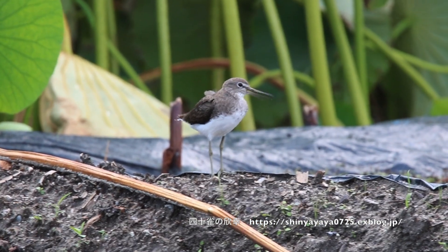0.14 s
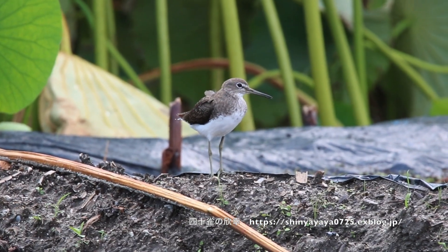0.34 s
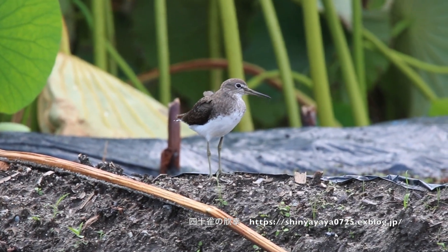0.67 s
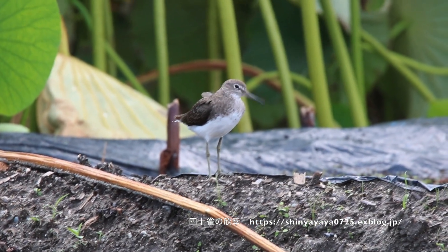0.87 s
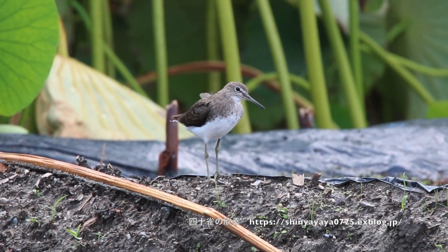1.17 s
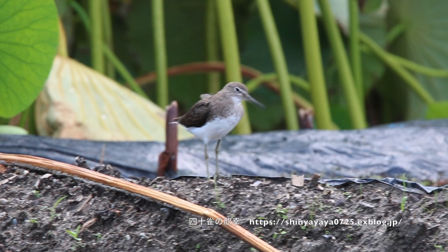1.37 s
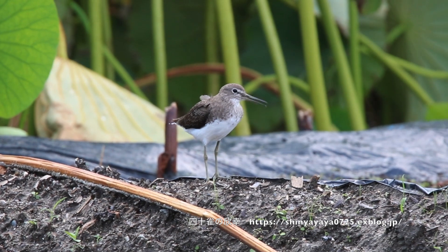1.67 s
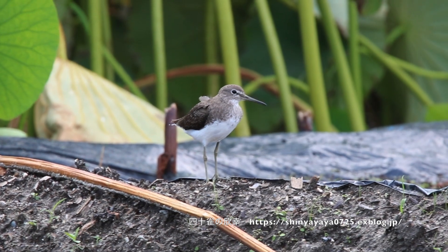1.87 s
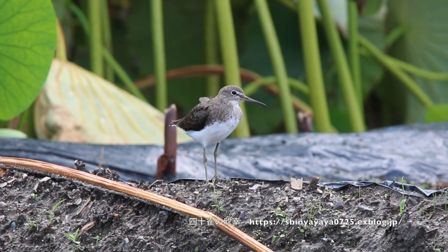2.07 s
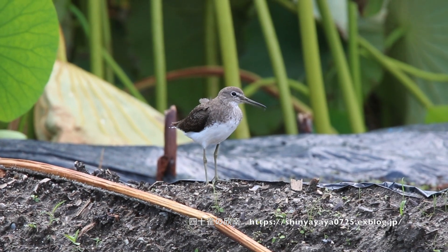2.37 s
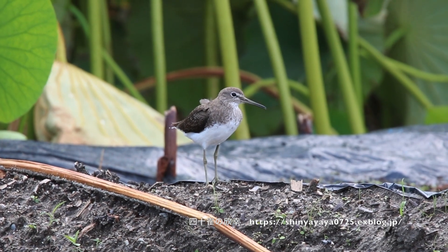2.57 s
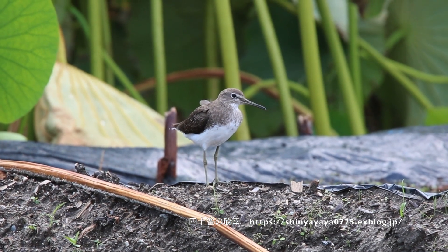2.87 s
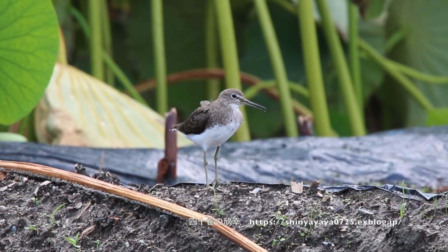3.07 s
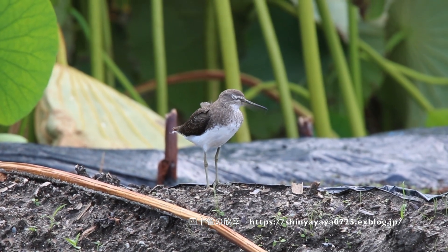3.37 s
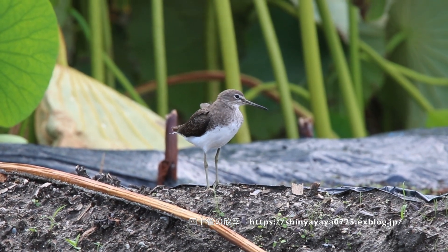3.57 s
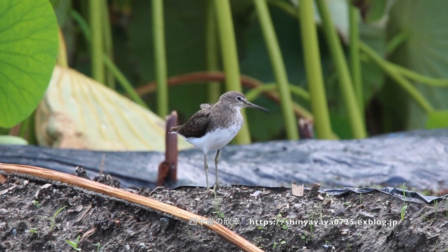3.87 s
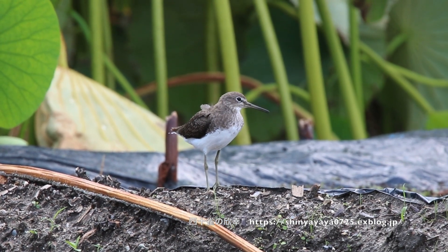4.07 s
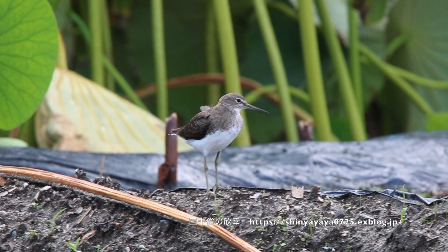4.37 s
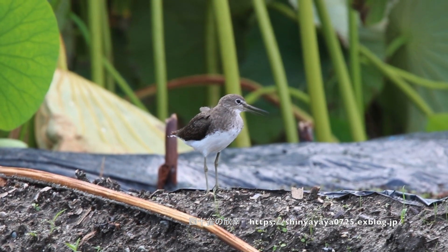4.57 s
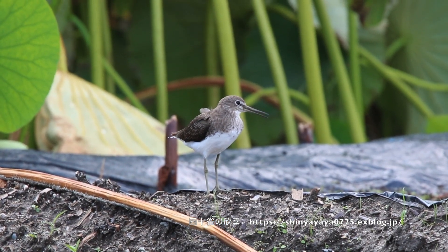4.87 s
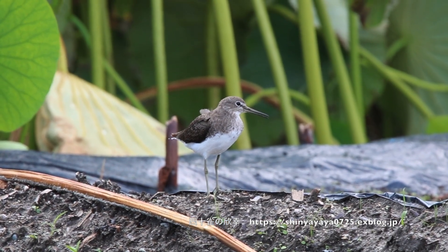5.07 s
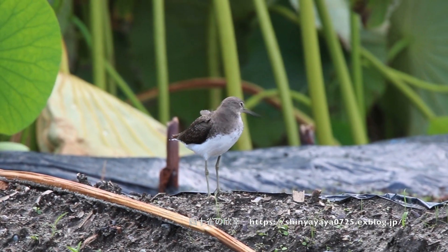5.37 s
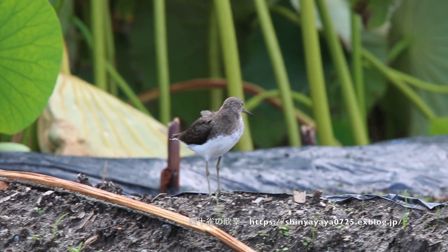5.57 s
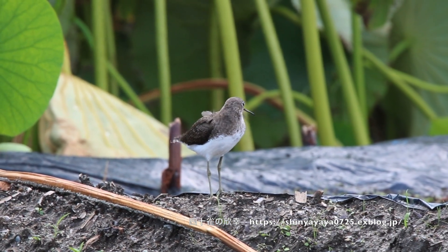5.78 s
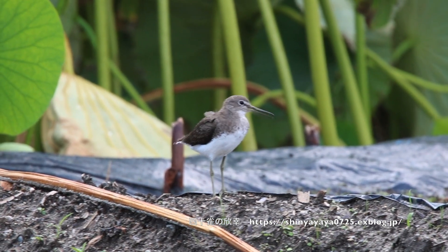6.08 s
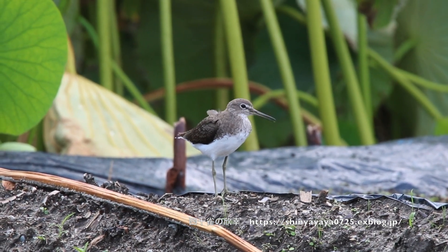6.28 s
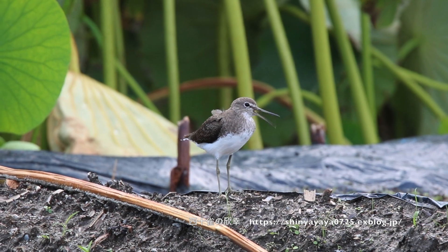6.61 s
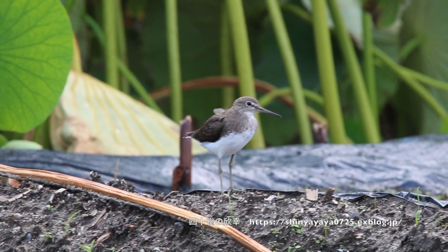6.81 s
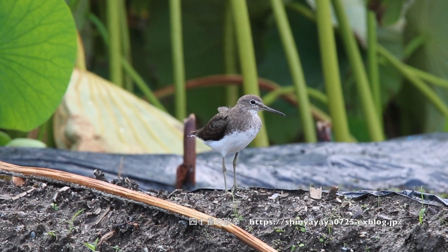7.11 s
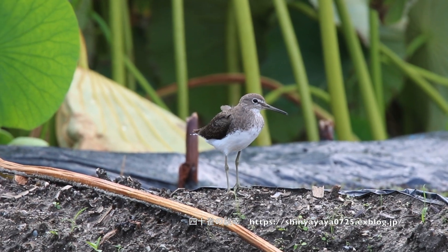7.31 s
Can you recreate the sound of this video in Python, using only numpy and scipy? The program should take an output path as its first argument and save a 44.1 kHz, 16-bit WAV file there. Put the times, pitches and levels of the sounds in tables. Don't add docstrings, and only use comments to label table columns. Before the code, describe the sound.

A small wading bird pipes sharp, high single notes about three times a second, while bursts of wind thump a close outdoor microphone.

```python
import sys
import numpy as np
from scipy import signal
from scipy.fft import rfft, irfft, next_fast_len
from scipy.io import wavfile
from scipy.ndimage import uniform_filter1d, map_coordinates

SR = 44100
rng = np.random.default_rng(int(sys.argv[2]) if len(sys.argv) > 2 else 0)


def boost(x):
    u = np.asarray(x, float) / 20
    return 10 ** u


def waveform_to_disk(signal):
    frames = np.transpose(np.atleast_2d(signal))
    scaled = np.clip(frames, -1, 1) * 32767
    samples = np.round(scaled).astype(np.int16)
    wavfile.write(sys.argv[1], SR, samples)


N = 328528

# f/Hz, level/dB per Hz
AIR_SPECTRUM = [(15, -29), (25, -0.5), (45, 1.5), (102, -0.5), (194, -7.5), (254, -7.5), (726, -11),
                (1030, -14.5), (1540, -15.5), (3290, -20.5), (4300, -27), (5200, -23), (5790, -26.5),
                (6500, -26), (11500, -37.5), (14000, -36.5), (15700, -40)]
# f/Hz, likeness/0-1
AIR_LIKENESS = [(60, 0.94), (300, 0.95), (1000, 0.56), (3000, 0.11), (7000, 0.019), (15000, .05)]
# t/s, level/dB
MOTOR_LEVEL = [(0, -53), (1.5, -54), (2.1, -50), (3, -51.5), (4.2, -50.5), (6.8, -48), (7.45, -61)]
# t of the turn/s, whine level/dB, buzz level/dB, hiss level/dB, whine length/s
CICADA_PHRASES = [
    (1.043, -42.5, -50, -47, 0.12),
    (2.394, -44.5, -70, -48, 0.16),
    (3.691, -41, -58, -46.5, 0.16),
    (5.046, -43, -71, -50.5, 0.14),
    (6.331, -40.5, -48.5, -46.5, 0.127),
    (7.64, -50, -49, -52, .1),
]
# t from the turn/s, f/Hz, level/dB
WHINE_GLIDE = [(-.14, 1860, -8), (-.1, 1880, -2), (-.085, 1780, 0), (-.045, 1830, 0), (-.03, 1980, 2),
               (-.02, 2300, 2), (-.009, 2800, 2), (-.004, 2900, -10)]
# f/Hz, level/dB per Hz
BUZZ_SPECTRUM = [(2200, 12), (3200, 2.5), (4500, 2), (5800, 6.5), (7200, 7), (8500, -3.5), (11000, -12)]
# t from the turn/s, lower f/Hz, upper f/Hz, level/dB
HISS_GLIDE = [
    (-.01, 8500, 11830, -17),
    (.008, 8770, 12440, -2),
    (.055, 9100, 13000, -3),
    (.085, 9750, 13500, -4.5),
    (.2, 9700, 13600, -6.5),
    (.3, 9370, 13400, -21),
]
# t/s, level/dB
INSECT_LEVEL = [(0, -60), (.5, -78), (.85, -69), (1.3, -68), (1.9, -68), (2.2, -43.5), (2.7, -54),
                (3.1, -43.5), (3.3, -42.5), (3.45, -42), (3.9, -57), (4.5, -55), (5.3, -49.5), (5.65, -46),
                (6.0, -59), (6.5, -48), (6.8, -50), (7.45, -48)]
# t/s, length/s, first f/Hz, last f/Hz, level/dB rms
SYLLABLES = [(0.476, 0.011, 4960, 5100, -45), (.494, 0.012, 3700, 4840, -41),
             (0.513, 0.013, 3680, 4640, -41), (0.526, 0.021, 3220, 4800, -48),
             (.603, .014, 4850, 5700, -42), (.618, 0.012, 4970, 5900, -48), (.633, 0.022, 4850, 3800, -39),
             (.66, 0.016, 3700, 2900, -47), (.684, .007, 4500, 3800, -42), (0.69, 0.026, 3880, 2860, -45.5),
             (3.379, 0.047, 3555, 3370, -50), (6.392, 0.062, 3830, 4050, -49),
             (6.591, 0.075, 3202, 3434, -54)]
# t/s, thump level/dB
GUST_LEVEL = [(1.9, -65), (2.08, -53), (2.87, -34), (3.31, -36), (3.61, -40.5), (3.83, -21), (4.06, -23),
              (4.77, -45.5), (5.08, -20.5), (5.31, -16), (5.59, -36.5), (5.98, -26), (6.18, -33),
              (6.97, -27), (7.17, -27.5), (7.24, -42), (7.4, -35), (7.45, -40)]
# t/s, thump level/dB, width/s, crackle level/dB
EDDIES = [(2.667, -19.5, 0.012, 5), (2.744, -15, 0.0056, -15), (2.873, -17, 0.018, -10),
          (3.026, -23.5, 0.0142, -2), (3.096, -8, 0.0095, -15), (3.343, -23.5, 0.026, -16),
          (3.448, -21, 0.032, -18), (3.585, -21, 0.075, -11), (3.637, -14.5, 0.01, -29),
          (3.94, -12, 0.042, -12), (4.004, -11, 0.013, -10), (4.105, -17, 0.016, -26),
          (4.17, -17, 0.0093, -24.5), (4.239, -8.5, 0.02, -9), (4.366, -14.5, 0.058, -25),
          (4.854, -20, 0.046, -10), (4.936, -15.5, 0.045, -28.5), (4.984, -8.5, 0.018, -22),
          (5.129, -13, 0.071, -8), (5.257, -23, 0.16, -19), (5.421, -11, 0.016, -5),
          (5.576, -13, 0.026, -13), (5.738, -8, 0.019, -6), (5.778, -12, 0.016, -17),
          (5.924, -15, 0.026, -9), (5.986, -19.5, 0.068, -5), (6.152, -14.5, 0.042, -14),
          (6.7, -18, 0.04, -4.5), (6.888, -23.5, 0.067, 9.5), (6.954, -14, 0.021, -3),
          (7.067, -13, 0.0075, -5), (7.117, -9, 0.0093, -13)]
# t/s, thump level/dB, width/s
LONE_PUFFS = [(2.13, -33, .07), (2.25, -33, .012), (2.286, -29.5, .015), (2.396, -25, 0.0093),
              (2.434, -28.5, .015), (2.525, -31.5, .03), (2.575, -23.5, 0.0086), (2.61, -30, 0.011),
              (2.8, -25, 0.015), (2.835, -28, 0.079), (2.965, -24.5, 0.039), (2.997, -22, 0.01),
              (3.147, -27, 0.011), (3.236, -22, 0.0095), (3.29, -32.5, .03), (3.342, -22, 0.01),
              (3.4, -33, .015), (3.69, -37, 0.015), (3.73, -35, 0.0098), (3.775, -29, 0.041),
              (4.076, -20, 0.026), (4.14, -32, .015), (4.429, -23, 0.017), (4.481, -20, 0.032),
              (4.7, -34, 0.021), (5.03, -21.5, 0.013), (5.496, -19, 0.015), (6.091, -21, 0.025),
              (6.25, -24, 0.018), (6.59, -21, 0.015), (7.156, -19.5, 0.017), (7.301, -19.5, 0.019),
              (7.345, -21, .015), (7.387, -24, 0.018), (7.44, -21, .02)]
# t/s, peak level/dB, crack level/dB
SHARP_KICKS = [(3.8605, -3, -18), (3.8771, -5, -28), (3.893, -11, -39), (3.9273, -11.5, -31),
               (3.9478, -12.5, -33), (3.9566, -9, -32), (3.9822, -5, -38), (4.2754, -8.5, -28),
               (4.2894, -3, -34), (4.3012, 2, -34), (4.3159, -4, -29), (4.5164, -11.5, -28),
               (5.1131, -8.5, -30), (5.1287, -6, -14), (5.2497, -12.5, -30), (5.2587, -11, -26),
               (5.2707, -7.5, -22), (5.3264, -7, -35), (5.3403, -28, -32), (5.36, -2.5, -37),
               (5.3771, -3, -15), (5.453, -8, -25), (5.4624, -0.5, -30), (5.7477, -8, -30),
               (5.8144, 0, -27), (5.8264, -7, -26), (5.8527, -9, -18), (5.8612, -7, -12), (5.9047, -1, -15),
               (6.4, -7, -22), (6.4766, -8.5, -25), (6.4846, -3, -25), (6.5114, -7.5, -22),
               (6.6709, -11, -32), (6.7568, 3.5, -15), (6.7685, -1, -22), (6.7878, -9.5, -30),
               (6.8092, -9, -36), (6.8947, -5.5, -18), (6.9063, -20, -19)]
# t/s, peak level/dB, crack level/dB
BARE_KICKS = [(4.306, -2.5, -26), (5.821, -9, -16), (6.883, -7.5, -34)]
# t/s, peak level/dB
SMALL_KICKS = [(2.6683, -14), (2.7946, -15.5), (3.0982, -23), (3.904, -10), (3.9745, -27), (4.0012, -14),
               (4.012, -16), (4.2098, -15), (4.221, -21), (4.2393, -24), (4.266, -29), (4.8554, -18),
               (4.983, -14), (4.991, -22), (5.084, -14), (5.0992, -17), (5.1602, -15), (5.179, -15),
               (5.1998, -15), (5.2087, -16), (5.2226, -18), (5.297, -12), (5.316, -16), (5.3508, -34),
               (5.4137, -34), (5.423, -24), (5.44, -27), (5.4697, -26), (5.4947, -12), (5.5674, -11),
               (5.5752, -11), (5.5843, -9.5), (5.7286, -20), (5.739, -28), (5.77, -21), (5.7813, -14),
               (5.7918, -13), (5.841, -5), (5.8707, -10), (5.9244, -12.5), (5.9325, -15), (5.9395, -14),
               (5.948, -20), (5.9837, -22), (5.9892, -13), (6.1375, -15), (6.158, -16), (6.1897, -16),
               (6.496, -26), (6.5323, -12.5), (6.6827, -15), (6.6996, -12), (6.8335, -11), (6.8624, -13),
               (6.9311, -13), (6.9443, -21), (6.953, -10.5), (7.0121, -17.5), (7.0685, -17), (7.1102, -18)]
# f/Hz, level/dB per Hz
THUMP_SPECTRUM = [(15, -46), (25, -10.5), (70, -6), (102, -0.5), (151, -0.5), (280, -8), (360, -23.5),
                  (620, -120)]
CRACKLE_SPECTRUM = [(200, -5), (280, 0.5), (400, -0.5), (600, -15), (900, -19), (1400, -60), (2500, -80)]
# t/s, level/dB
DEEP_SHARE = [(1.9, 9.5), (3.7, 9), (4.25, -9.5), (4.7, 15.5), (5.3, -6), (5.7, -8), (6.2, -1.5),
              (6.7, -41), (7.45, 9.5)]
# t/s, end t/s
RIGHT_SPELLS = [(2.08, 2.18), (2.385, 2.41), (2.93, 3.012), (3.39, 3.41), (3.545, 3.695), (4.19, 4.293),
                (4.33, 4.45), (4.57, 4.72), (6.525, 6.745), (6.842, 7.45)]
# t/s, level/dB
GUARD_BLEND = [(1.9, -23), (3.84, -22), (3.95, -8), (4.03, -2), (4.5, -2), (4.85, -4), (5.2, -1.5),
               (5.7, -.6)]
# f/Hz, t60/s
LEAF_DECAY = [(2000, 0.36), (4800, 0.15), (5500, 0.24), (9000, 0.26)]
# t/s, level/dB, top f/Hz, length ratio, third partial level/dB
SCOOPED_NOTES = [(0.234, -18, 2730, 0.98, 5), (0.5598, -18.5, 2750, 0.98, 5.5),
                 (0.8595, -18.5, 2764, 1.02, 5), (1.1577, -17, 2795, 0.97, 3.5),
                 (1.454, -16.5, 2793, 0.91, 2.5), (1.759, -17, 2790, 0.92, 4), (2.544, -17, 2775, 0.94, 1),
                 (2.85, -18, 2753, 0.99, 2), (3.1557, -18, 2740, 0.95, 2), (3.4698, -18.5, 2757, 0.97, 3.5),
                 (3.7824, -19, 2780, 1, 6.5), (4.0778, -19, 2820, 1.02, 6), (4.3752, -21, 2850, 1.09, 7.5),
                 (4.669, -18, 2810, 1.008, 5), (4.958, -17.5, 2793, 0.996, 6.5),
                 (5.2558, -18, 2753, 1.04, 4.5), (6.166, -17.5, 2859, 1.04, 5.5),
                 (6.4568, -18.5, 2830, 1.02, 4), (6.731, -17.5, 2813, 0.87, 2.5),
                 (7.021, -17, 2816, 1.01, 2), (7.3197, -17, 2786, 1, 0)]
SLURRED_NOTES = [(5.5677, -18.5, 2770, 0.99, 8.9), (5.8817, -18.5, 2790, 1.04, 6.5)]
# t from the onset/s, f/Hz, effort level/dB
NOTE_ARCH = [
    (-.002, 1735, -13),
    (.0015, 2366, -0.5),
    (.007, 2520, 2.5),
    (0.0107, 2590, -1.5),
    (.015, 2720, 0.5),
    (.020, 2792, -5),
    (.025, 2710, -9.5),
    (.042, 1953, -16.5),
    (.047, 1800, -28),
]
# t from the onset/s, f/Hz, effort level/dB
SLUR_RISE = [(-.003, 2060, -19), (-.001, 2180, -4), (.002, 2334, -6.5), (.008, 2460, -1.5),
             (0.013, 2565, -4)]
# f/Hz, level/dB
WINDPIPE_GAIN = [(1900, -38), (2200, -27), (2350, -21.5), (2780, -11.5), (6300, -36), (6900, -25),
                 (7400, -21), (7900, -19), (8350, -18)]
# f/Hz, level/dB
LEFT_PATH = [(2000, -16), (2800, -1.5), (3600, 0.5), (5000, -1), (5300, -3.5), (5470, 0), (7700, 4),
             (10000, 7), (14000, -3)]
RIGHT_PATH = [(2000, 11), (2800, -1.5), (3600, -5), (4800, -5.5), (5060, -18), (5220, -4.5), (5450, -3),
              (7400, -10.5), (7900, -7.5), (10000, -10), (14000, -6)]


def unit(x):
    return x / np.sqrt(np.mean(x ** 2) + 1e-20)


def along(points, hz):
    f, v = np.transpose(points)
    return np.interp(np.log(hz + 1), np.log(f + 1), v)


def curves(rows, t):
    s, *cols = np.transpose(rows)
    return [np.interp(t, s, c) for c in cols]


def wobble(rate):
    knots = rng.standard_normal(int(N * rate / SR) + 4)
    return map_coordinates(knots, [np.arange(N) * rate / SR])


def pair(two, spectrum, alike):
    lead_s = 9 / SR
    m = next_fast_len(N + 8192)
    hz = np.fft.rfftfreq(m, 1 / SR)
    turn = np.arccos(np.clip(along(alike, hz), -1, 1)) / 2
    mid, side = rfft(two, m) * boost(along(spectrum, hz)) * [np.cos(turn), np.sin(turn)]
    left = (mid + side) * np.exp(2j * np.pi * hz * lead_s)
    return unit(irfft([left, mid - side], m)[:, :N])


def pan(db):
    return boost(np.array([[db / 2], [-db / 2]]))


def add(track, s, x):
    part = track[..., round(s * SR):][..., :x.shape[-1]]
    part += x[..., :part.shape[-1]]


def fuzzy(hz, width_hz, steady=0):
    phase = 2 * np.pi * np.cumsum(hz) / SR
    noise = rng.standard_normal((2, 2, N))
    slow = unit(uniform_filter1d(noise, size=int(SR / width_hz), axis=2))
    return unit((slow[0] + steady) * np.sin(phase) + slow[1] * np.cos(phase))


def air():
    z = signal.stft(rng.standard_normal((2, N + 512)), nperseg=512)[2]
    field = uniform_filter1d(rng.standard_normal(z.shape[1:]), 6, axis=0)
    patches = unit(uniform_filter1d(field, 14, axis=1))
    two = signal.istft(z * boost(1.02 * patches), nperseg=512)[1][:, :N]
    t = np.arange(N) / SR
    motor = np.sin(2 * np.pi * 787 * t + 0.8 * wobble(11))
    motor = motor * boost(curves(MOTOR_LEVEL, t)[0] + 1.2 * wobble(2.6))
    return pair(two, AIR_SPECTRUM, AIR_LIKENESS) * boost(-34.5) * pan(2.04) + motor * pan(-11.0)


def cicada_whine(since, level_db, length):
    hz, db = curves(WHINE_GLIDE, since)
    fading = np.clip((2300 - hz) / 200, 0.2, 1)
    whine = fuzzy(hz, width_hz=170, steady=1.0)
    for k, over_db in (2, -3), (3, -10), (4, -11):
        whine = whine + fading * boost(over_db) * fuzzy(k * hz, width_hz=130 * k, steady=1.0 / k ** 2)
    swell = np.clip((since + length) / 0.0074, 0, 1) * (since < WHINE_GLIDE[-1][0])
    return whine * boost(level_db + db + 2.2 * wobble(70)) * swell


def cicada_hiss(since, level_db):
    low_hz, high_hz, db = curves(HISS_GLIDE, since)
    hiss = boost(2.14 * wobble(40)) * fuzzy(low_hz, width_hz=1900)
    hiss = hiss + 0.68 * pan(3.4) * fuzzy(high_hz, width_hz=3000)
    hiss = hiss + 0.76 * fuzzy(0.49 * low_hz, width_hz=250)
    return hiss * boost(level_db + db) * (since > HISS_GLIDE[0][0]) * (since < HISS_GLIDE[-1][0])


def insects():
    t = np.arange(N) / SR
    turn, whine_db, buzz_db, hiss_db, length = np.transpose(CICADA_PHRASES)
    phrase = np.searchsorted(turn + 0.5, t).clip(0, len(turn) - 1)
    since = t - turn[phrase]
    whine = cicada_whine(since, whine_db[phrase], length[phrase])
    swell = np.interp(since, [-0.2, -0.22, 0.036, 0.017, 0.33], [0.03, 1.3, 2.0, 0.24, 0])
    buzz = boost(buzz_db[phrase]) * swell + boost(curves(INSECT_LEVEL, t)[0])
    buzz = buzz * pair(rng.standard_normal((2, N)), BUZZ_SPECTRUM, [(5000, 0.039)])
    hiss = cicada_hiss(since, hiss_db[phrase])
    crickets = boost(-61.5 + 1.44 * wobble(1.74)) * fuzzy(np.full(N, 5200), width_hz=100)
    return whine * pan(0.16) + buzz + hiss * pan(5.3) + crickets


def twitter():
    out = np.zeros(N)
    for k, (s, length, first_hz, last_hz, db) in enumerate(SYLLABLES):
        u = np.arange(0, 1, 1 / (length * SR))
        hook = max(4.2 - 0.67 * k, 1.3)
        if last_hz > first_hz:
            glide = np.sin(hook * u) / np.sin(min(hook, np.pi / 2))
        else:
            glide = u ** 1.19
        hz = first_hz + (last_hz - first_hz) * glide
        loudness = np.abs(np.sin(np.pi * u ** 0.85)) ** 0.21
        add(out, s, boost(db + 4.5) * loudness * np.sin(2 * np.pi * np.cumsum(hz) / SR))
    return out


def trill():
    start_s, length_s, edge_s = 6.885, 0.112, 0.0067
    out = np.zeros(N)
    since = np.arange(0, length_s, 1 / SR)
    t = start_s + since
    edges = np.clip(np.minimum(since, length_s - since) / edge_s, 0, 1)
    slowing = 900 * np.clip(t - 6.965, 0, 1) ** 2 / 2
    swing = np.cos(2 * np.pi * (99 * (t - 6.938) - slowing))
    hz = 6410 - 980 * (since / length_s) ** 1.3 + 620 * swing
    level = boost(-40 - 7.5 * swing + 1.5 * wobble(147)[:len(t)])
    add(out, start_s, edges * level * np.sin(2 * np.pi * np.cumsum(hz) / SR))
    return out


def songbirds():
    return twitter() * pan(1.0) + trill() * pan(-9.0)


def wind_flow():
    t = np.arange(N) / SR
    lumps_db = 5 * wobble(29)
    thump = boost(curves(GUST_LEVEL, t)[0] + lumps_db) ** 2 * (t > GUST_LEVEL[0][0])
    crackle = thump * boost(-19.5) ** 2
    wakes = [(s, -11.5 + 0.5 * db, 0.017, 1) for s, db, _ in SHARP_KICKS]
    puffs = [(*puff, -11.5) for puff in LONE_PUFFS]
    u = np.arange(-4000, 4000) / SR
    for s, db, width, crackle_db in EDDIES + wakes + puffs:
        power = boost(db) ** 2 * np.exp(-(u / (0.41 * width)) ** 2)
        add(thump, s - 4000 / SR, power)
        add(crackle, s - 4000 / SR, power * boost(crackle_db - 4.5) ** 2)
    strength = boost(2.0 * rng.exponential(size=(2, N)).clip(0, 3))
    knocks = (rng.random((2, N)) < 300 / SR) * -strength
    rough = 0.55 * unit(knocks) + rng.standard_normal((2, N))
    out = np.zeros((2, N))
    for power, spectrum in (thump, THUMP_SPECTRUM), (crackle, CRACKLE_SPECTRUM):
        flow = pair(rough, spectrum, [(100, 0)])
        flow = flow / np.sqrt(np.abs(uniform_filter1d(flow ** 2, size=1500, axis=1)) + 0.14)
        out += flow * np.sqrt(power) * boost([[0], [-20]])
    return out


def wind_kicks():
    out = np.zeros(N)
    u = np.arange(-400, 400) / SR
    hits = SHARP_KICKS + BARE_KICKS + [(s, db, -34) for s, db in SMALL_KICKS]
    for (s, db, crack_db), (tune, lean) in zip(hits, rng.standard_normal((len(hits), 2))):
        hz = (391 + 7 * db) * np.exp(0.21 * tune)
        width_s = 0.0016 * boost(-0.15 * (db + 14.5))
        swing = np.cos(2 * np.pi * hz * u + 0.93 * lean) * np.exp(-(u / width_s) ** 2)
        crack = np.cos(2 * np.pi * 1050 * u) * np.exp(-(u / 0.00086) ** 2)
        add(out, s - 400 / SR, -boost(db + 2.0) * (swing + boost(crack_db + 2.0) * crack))
    return out


def wind():
    deep_hz, blend_hz = 106, 290
    t = np.arange(N) / SR
    out = wind_flow()
    out[0] += wind_kicks()
    deep = signal.sosfiltfilt(signal.butter(2, deep_hz, fs=SR, output="sos"), out)
    out = out + (boost(curves(DEEP_SHARE, t)[0]) - 1) * deep
    spells = sum(1.0 * (t > s) * (t < end) for s, end in RIGHT_SPELLS)
    right = uniform_filter1d(spells, size=200)
    ports = out * (1 - right) + out[::-1] * right
    bass = signal.lfilter(*signal.butter(1, blend_hz, fs=SR), ports)
    return ports + boost(curves(GUARD_BLEND, t)[0]) * bass[::-1]


def leaf_echo(x):
    nearest_s = 0.0071
    out, step = np.zeros((2, N)), SR // 3
    for a in range(0, N, step):
        hz, t, z = signal.stft(rng.standard_normal((2, step)), SR, nperseg=128)
        fall = boost(-60 * t / along(LEAF_DECAY, hz)[:, None])
        fall = fall + 1.1 * boost(-60 * t / 0.027)
        rise = np.clip(t / 0.0046, 0, 1) ** 2
        tail = signal.istft(z * fall * rise, SR, nperseg=128)[1]
        tail = tail / np.linalg.norm(tail[0])
        add(out, a / SR + nearest_s, signal.fftconvolve(x[:, a:a + step], tail, axes=1))
    return out


def valve_snap(u, snap_db):
    ring = np.exp(-(u / 0.0017) ** 2) * np.cos(2 * np.pi * 5280 * u)
    tick = boost(5.5) * np.exp(-(u / 0.00014) ** 2) * np.sin(2 * np.pi * 7500 * u)
    return (boost(snap_db) * ring + boost(snap_db) * tick) * pan(4.3)


def arched_note(t, shape, shuts_s, db, top_hz, length, third_db):
    since = np.where(t > 0, t / length, t)
    hz, second = curves(shape, since)
    closing = np.clip((since - 0.017) / 0.012, 0, 1)
    arch = np.clip((hz - 2500) / (hz.max() - 2500), 0, 1)
    hz = uniform_filter1d(hz + arch * (top_hz - hz.max()), size=40)
    phase = 2 * np.pi * np.cumsum(hz) / SR
    first = second + along(WINDPIPE_GAIN, hz) + 11 * closing
    shut = np.clip((since - shuts_s) / 0.0037, 0, 1)
    third = second + along(WINDPIPE_GAIN, 3 * hz) - 19 * shut + third_db
    fourth = third - 17
    fifth = 0.34 * second - 35 - 10 * (1 - arch) ** 2 - 12 * closing
    note = np.zeros((2, len(t)))
    for k, level in enumerate([first, second, third, fourth, fifth], start=1):
        path = np.array([along(LEFT_PATH, k * hz), along(RIGHT_PATH, k * hz)])
        trail = 1.1 * (k == 1) * np.array([[0], [1]])
        note += boost(db + 2.0 + level + path) * np.sin(k * phase + k * k - trail)
    return note


def wading_bird():
    onset_s, snap_s, snap_db = 0.0028, -0.0025, -16.5
    lead = onset_s - snap_s
    out = np.zeros((2, N))
    slur = SLUR_RISE + NOTE_ARCH[len(SLUR_RISE) - 1:]
    kinds = [(SCOOPED_NOTES, NOTE_ARCH, 0.011, snap_db), (SLURRED_NOTES, slur, 0.013, 3 * snap_db)]
    for notes, shape, shuts_s, kind_snap_db in kinds:
        for s, db, top_hz, length, third_db in notes:
            t = np.arange(-lead, NOTE_ARCH[-1][0] * length, 1 / SR)
            note = arched_note(t, shape, shuts_s, db, top_hz, length, third_db)
            onset = np.clip((t - shape[0][0]) / onset_s + 1, 0, 1) ** 2
            snap = valve_snap(t - snap_s, db + kind_snap_db)
            add(out, s - lead, note * onset * pan(-0.2) + snap)
    return out


def scene():
    far, near = songbirds(), wading_bird()
    echo = leaf_echo(boost(-8.0) * near[0] * pan(2.95) + boost(-3.5) * far)
    return air() + insects() + far + wind() + echo + near


def top_cut(x):
    return signal.sosfilt(signal.butter(12, 15840, fs=SR, output="sos"), x)


def record(dry):
    x = signal.sosfilt(signal.butter(2, 45, "high", fs=SR, output="sos"), dry)
    x = x / (1 + np.abs(x) ** 10) ** (1 / 10)
    x = signal.sosfiltfilt(signal.ellip(10, 0.1, 80, 15800, fs=SR, output="sos"), x)
    return top_cut(x)


dry = scene()
out = record(dry)
waveform_to_disk(out)
```